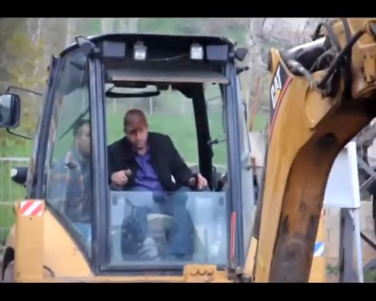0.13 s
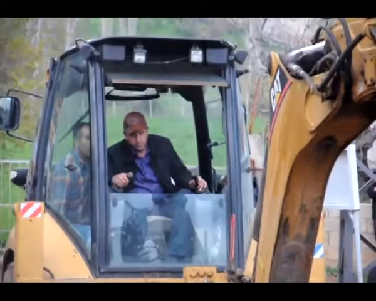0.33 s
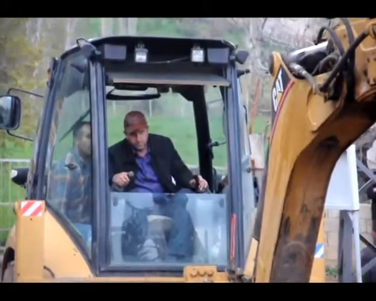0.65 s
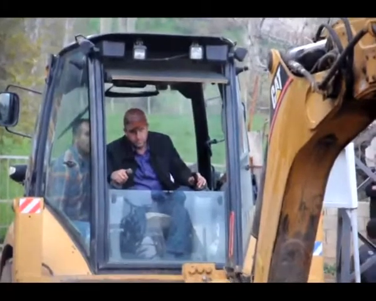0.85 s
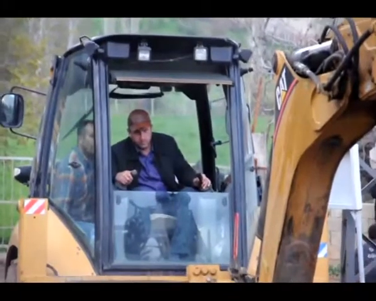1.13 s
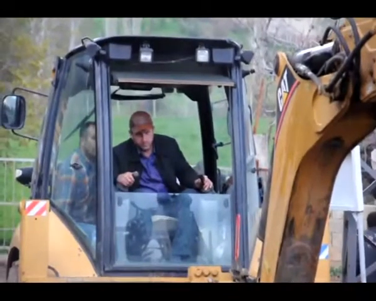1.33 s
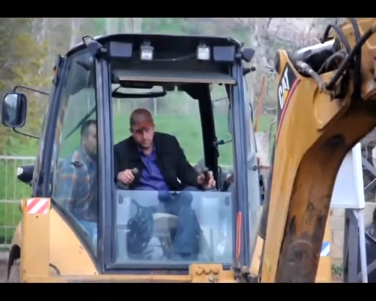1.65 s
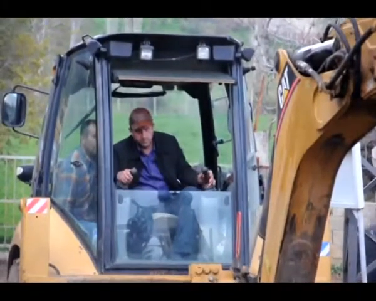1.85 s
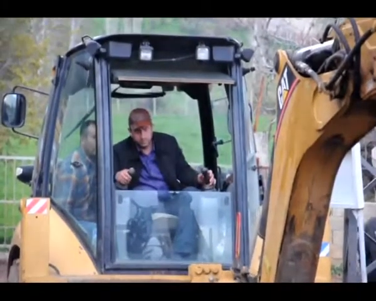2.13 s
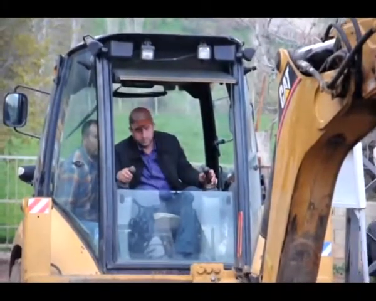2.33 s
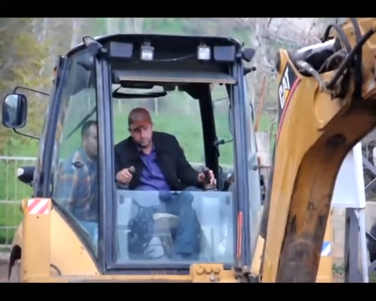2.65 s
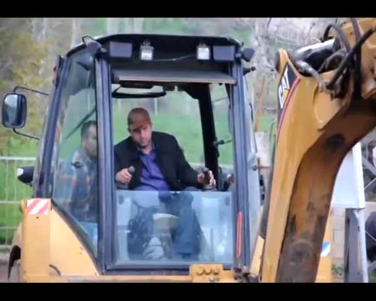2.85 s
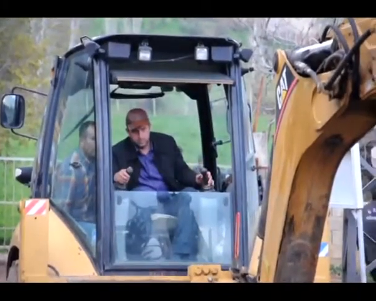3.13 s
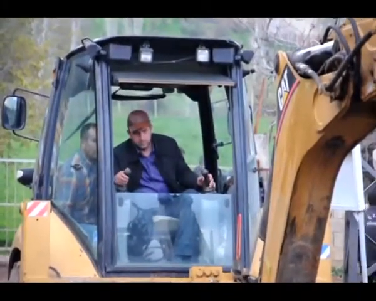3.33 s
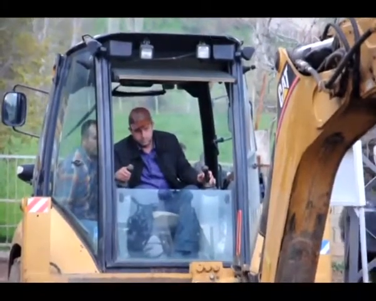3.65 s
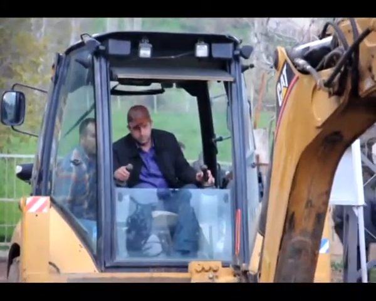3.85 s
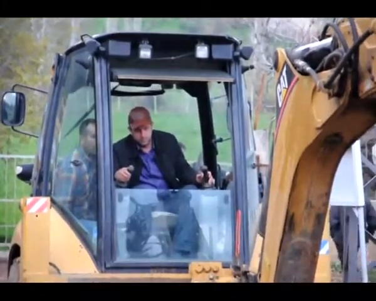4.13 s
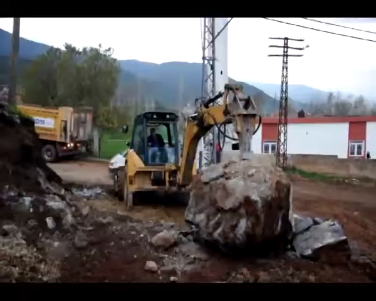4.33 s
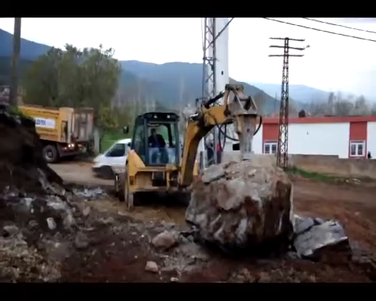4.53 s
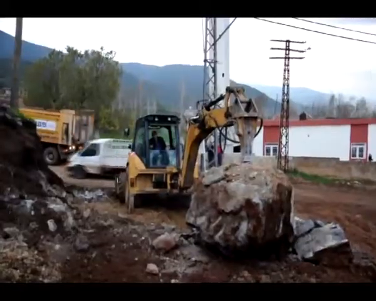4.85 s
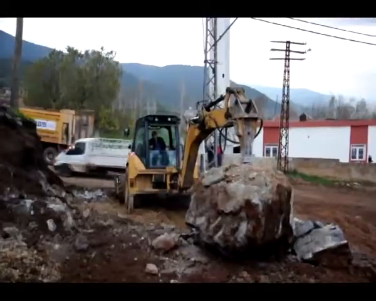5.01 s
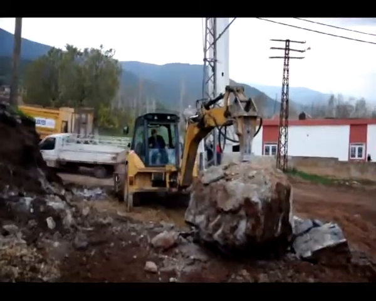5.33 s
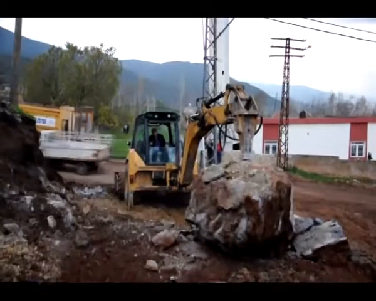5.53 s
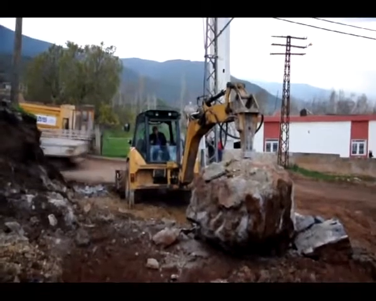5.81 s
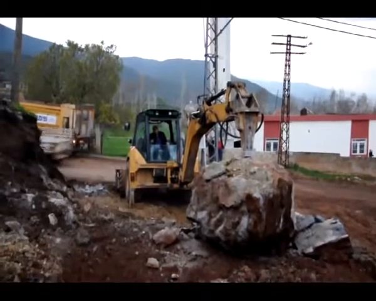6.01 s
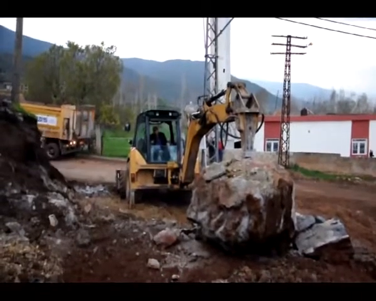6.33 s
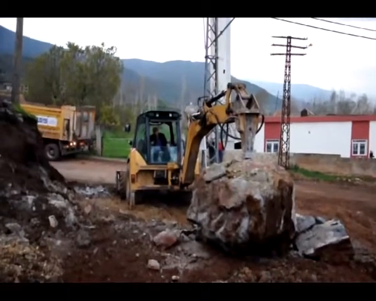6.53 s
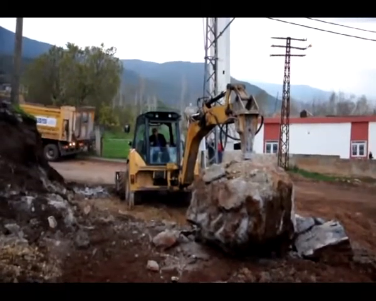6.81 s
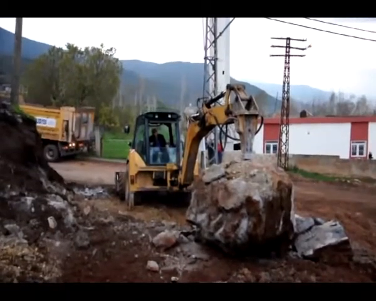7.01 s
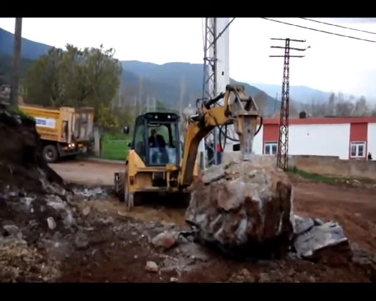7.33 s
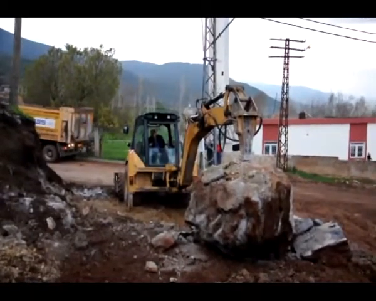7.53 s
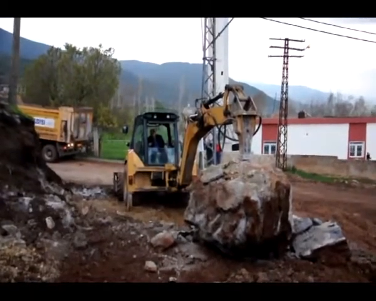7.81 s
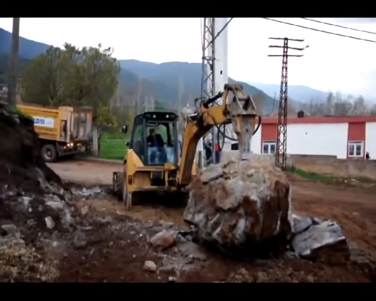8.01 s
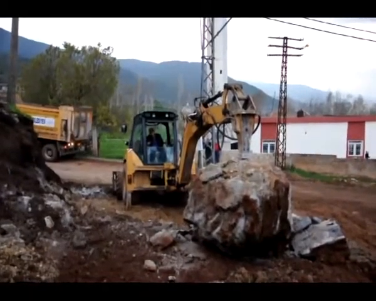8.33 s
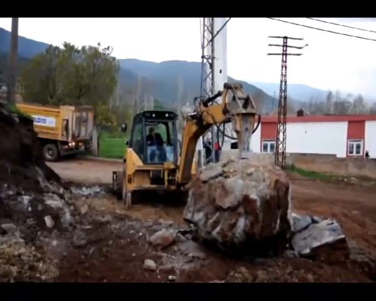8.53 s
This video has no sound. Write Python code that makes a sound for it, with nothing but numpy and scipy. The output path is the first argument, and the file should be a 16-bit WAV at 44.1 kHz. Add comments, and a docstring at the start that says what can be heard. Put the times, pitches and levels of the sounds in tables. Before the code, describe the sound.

Rapid metallic hammering on rock, each blow a short crack with ringing steel and dense clatter, starts already under way outdoors. The rhythm sags for about a second, with dull stone knocks, then returns to full speed, briefly skidding and uneven. After a quick fade and tiny gap, the same hammering rises again, more distant and regular, above engine noise and pump hum, with a faint wall echo, through a small microphone.

```python
"""A hydraulic breaker hammers a boulder at an open roadside site, some thirteen blows a second, slower from 1
to 2 s. Each blow is a short crack and a thud, ringing modes of chisel, housing and boom, and a dense clatter of
noise. A diesel engine (throbbing noise) and its pump (a wavering tone) hum below; a loose stone tumbles in
random knocks. The small microphone hears a nearby wall answer. The sound fades out, stops briefly and fades in
again; the later blows ring as if from farther off."""
import sys
import numpy as np
from scipy import signal
from scipy.fft import rfft, irfft
from scipy.io import wavfile

SR = 44100
rng = np.random.default_rng(int(sys.argv[2]) if len(sys.argv) > 2 else 0)


def transcribe(signal):
    """Save signal, clipped to [-1, 1], as a 16-bit WAV file at the path in sys.argv[1]."""
    frames = np.atleast_2d(signal).T
    limited = np.clip(frames, -1, 1)
    pcm = np.round(limited * 32767).astype(np.int16)
    wavfile.write(sys.argv[1], SR, pcm)


def gain_from_db(level_db):
    """Convert decibel levels to linear amplitude factors (20 dB per decade)."""
    decades = np.asarray(level_db, float) / 20
    return 10 ** decades


N = 382347   # samples in the scene
RING = 9000   # samples a blow lasts

# Ringing modes of chisel, housing and boom: (frequency [Hz], t60 of the main ring [s], then the relative
# level [dB] with the chisel skidding, biting, slow, steady, and heard from afar)
STEEL_MODES = [(310, 0.067, -5.5, -6, -6.5, -15.5, -15.5), (539.2, 0.097, -26, -12.5, -6.5, -8.5, -5.5),
               (617.4, 0.085, -30, -4, -5, -12.5, -11), (822, 0.039, -2.5, -3, -2, -1, 1.5),
               (920, 0.042, -8, -11, -1.5, 4, 7.5), (990, 0.03, -4.5, -8, -16, -1, 1.5),
               (1184, 0.032, 2.5, -2, -51, -11, -11.5), (1316, 0.022, 6.5, -16, -19, -18, -6),
               (1620, 0.11, -4.5, -11.5, -38, -16, -14), (1778, 0.042, -0.5, 1.5, -10, -8, -16.5),
               (1933, 0.037, -3.5, 0.5, -1, 1, -5.5), (2003, 0.058, -8, -5.5, -12, -8, -6),
               (2296, 0.07, -9.5, -9.5, -22, -18, -17), (2524, 0.054, -18, -25, -14, -11, -7.5),
               (2647, 0.03, -11, -23, -5.5, -4.5, -14), (2727, 0.048, -3.5, -6, 2.5, -6.5, -8.5),
               (3085, 0.047, -4, -7, -1, -8, -14), (3720, 0.056, -19, -14.5, -6.5, -12.5, -34),
               (3775, 0.072, -23.5, -7.5, -9.5, -4.5, -13), (4109, 0.082, -9.5, -7.5, -9.5, -14.5, -16.5),
               (4333, 0.057, -6.5, -0.5, -11.5, -12, -17), (5730, 0.017, -13, -16, -5.5, -13, -16.5),
               (6550, 0.049, -11.5, -6.5, -24, -19, -23.5), (6920, 0.18, -29.5, -26.5, -30.5, -20.5, -30)]
# Stretches of work: (start time [s], extra weight of the first instants [ratio], relative clatter level [dB],
# clatter tilt [dB per octave], relative crack level [dB], relative thud level [dB])
STRETCHES = [(-.1, 0.084, -6, 2.2, 4, -24), (.4, 0.19, -7, 2.5, 14.5, -28),
             (1.05, 0.69, -6, 2.45, 3.5, -14.5), (2.2, 0.14, -8, 1.26, 9, -21.5),
             (3.45, 0.14, -6, 1.7, 12, -30), (4.33, 0.092, -10, 1.3, 8.5, -21)]
# How the chisel sits in each stretch: (which level of STEEL_MODES [index from 0])
MODE_LEVEL_INDEX = [0, 1, 2, 3, 0, 4]
# How firmly the chisel stays put in each stretch: (likeness of successive blows [0-1])
STRETCH_LIKENESS = [.55, .75, .92, .92, .25, .93]
# Piston speed, sagging while the oil flow is shared: (time [s], rate [blows per s])
PISTON_RATE = [(0, 13.673), (.15, 12.726), (.25, 13.053), (.9, 9.658), (1.35, 8.323), (2.025, 8.797),
               (2.45, 13.225), (3.275, 13.614), (3.425, 12.764), (3.725, 14.002), (4.3, 14.392),
               (4.35, 13.539), (8.67, 13.419)]
# Runs of hammering, near and then far: (first blow [s], end [s])
HAMMERING_RUNS = [(-0.0291, 4.29), (4.3585, 8.67)]
# Force of the blows: (time [s], relative level [dB])
BLOW_FORCE = [(0, -21.5), (.45, -23.5), (1.0, -25.5), (1.15, -26.5), (2.0, -27.5), (2.3, -21.8), (2.6, -24),
              (3.4, -23), (3.85, -24.5), (4.25, -24), (4.35, -18), (5.5, -18), (5.66, -20.5), (6.3, -21.5),
              (7.6, -21), (7.85, -19), (8.2, -21), (8.67, -20)]
# Colour of the clatter: (frequency [Hz], relative level [dB])
CLATTER_COLOUR = [(60, -6), (110, -26), (230, -3), (500, -5), (900, 4.5), (1400, -8), (2500, -4.5),
                  (4500, -6.5), (7000, -11), (7800, -34), (9800, -51)]
# Dying of the clatter: (frequency [Hz], first t60 [s], late t60 [s], late part re first [dB], rise time [s])
CLATTER_DYING = [(101, 0.12, 0.11, 0, 0.00067), (680, 0.13, 0.48, -9, 0.0011),
                 (2050, 0.12, 0.23, -5, 0.00039), (7340, 0.04, 0.11, -9.5, 0.0017)]
# Colour of the engine noise: (frequency [Hz], relative density [dB per Hz])
ENGINE_COLOUR = [(15, -51), (25, -16.5), (559, 0.5), (1470, -3.5), (2670, -7.5), (3430, -10), (8180, -22),
                 (9500, -58), (12400, -68.5), (20900, -120)]
# Engine before the fades: (time [s], rms level [dB])
ENGINE_LOUDNESS = [(0, -33.5), (1.5, -44.5), (3.5, -38.5), (5, -38.5), (8.67, -45)]
# Pump hum before its waver and the fades: (time [s], rms level [dB])
PUMP_LOUDNESS = [(0, -45.5), (.9, -54), (1.2, -42), (1.7, -49), (2, -55.5), (3.4, -50.5), (3.9, -47),
                 (4.5, -46.5), (5.4, -47.5), (6.25, -40), (6.7, -52.5), (6.95, -41.5), (8.67, -44.5)]
# Loose stone knocking down the boulder: (time of the peak [s], peak of its swell [dB])
STONE_FALLS = [(.98, -26.5), (1.29, -44)]
# Faint side signal: (frequency [Hz], side re mid [dB])
SIDE_LEVEL = [(100, -33.5), (300, -50), (1400, -46), (8000, -36.5)]

CRACK_S, THUD_HZ = 0.00044, 105   # length of the steel-on-stone shock; pitch of boulder and ground
FORCE_SCATTER_DB = 1.25   # standard deviation between blows, for a wholly loose chisel
SLIP_AFTER_S = 0.0018   # earliest moment of a slip
SLIP_SPAN_S = (0.014, 0.04)   # range of each slip's moment beyond that
SLIP_SHARE = (0.74, 0.3)   # largest share of the blow in each slip, for a wholly loose chisel
ECHO_S, ECHO_DB = 0.031, -19   # delay and level of the answer from a nearby wall
FIRING_HZ, PUMP_HZ = 47.45, 257.6
STONE_LOW_HZ, STONE_HIGH_HZ = 194.8, 1100
STONE_RISE_S, STONE_FALL_DB_PER_S = 0.036, 42
FADE_START_S, SILENT_S = 4.277, 4.301
BACK_S, BACK_GAIN, FULL_S = 4.384, 0.12, 4.7
MICROPHONE_CUT_HZ = 8820


def rms_one(x):
    """Scale to rms 1."""
    return x / np.sqrt(np.mean(x ** 2) + 1e-20)


def in_time(rows):
    """Columns of a curve at every sample."""
    s, *columns = np.transpose(rows)
    return [np.interp(np.arange(N) / SR, s, c) for c in columns]


def at_hz(rows, hz):
    """Columns of a table read on a log-frequency axis."""
    f, *columns = np.transpose(rows)
    return [np.interp(np.log(hz), np.log(f), c) for c in columns]


def shaped(x, rows):
    """Filter a whole sound by a spectrum."""
    hz = np.maximum(np.arange(N // 2 + 1) * SR / N, 1)
    return irfft(rfft(x) * gain_from_db(at_hz(rows, hz)[0]), N)


def drifting(fresh, likeness):
    """Each row keeps a share of the row before it; the spread stays 1."""
    out = fresh.copy()
    for k in range(1, len(out)):
        out[k] = likeness[k] * out[k - 1] + np.sqrt(1 - likeness[k] ** 2) * fresh[k]
    return out


def blow_times():
    """The piston strikes each time its cycle count passes a whole number from the start of the run."""
    s = np.arange(-100, 8800) / 1000
    rate = np.interp(s, *np.transpose(PISTON_RATE))
    cycles = np.cumsum(rate) / 1000
    first, end = np.interp(np.transpose(HAMMERING_RUNS), s, cycles)
    return np.concatenate([np.interp(np.arange(a, b), cycles, s) for a, b in zip(first, end)])


def crack(stretch, t):
    """The first shock, one short push and pull, and the slow thud of boulder and ground behind it."""
    crack_db, thud_db = np.array(STRETCHES)[stretch, 4:].T[:, :, None]
    shock = -np.sin(2 * np.pi * np.minimum(t / CRACK_S, 1)) * np.exp(-t / CRACK_S)
    thud = np.sin(2 * np.pi * THUD_HZ * t) * (t / 0.0056) * np.exp(1 - t / 0.0045)
    return gain_from_db(crack_db) * shock + gain_from_db(thud_db) * thud


def ringing(stretch, likeness, t):
    """The steel's modes; strength and phase hold while the chisel stays put and scatter as it skids."""
    hz, t60, *levels_db = np.transpose(STEEL_MODES)
    looseness = np.sqrt(1 - likeness ** 2)[:, None, None]
    wander = looseness * rng.standard_normal((len(stretch), 2, len(hz)))
    level_db = np.array(levels_db)[np.array(MODE_LEVEL_INDEX)[stretch]]
    strength = gain_from_db(level_db + 2.76 * wander[:, 0])
    # high modes start together, low ones against each other
    signs = np.where(hz < 1100, (-1) ** np.arange(len(hz)), 1)
    struck = signs * strength * np.exp(1j * wander[:, 1])

    hz, t60 = hz[:, None], t60[:, None]
    # the shock takes longer to reach the big, low parts
    rise_s = 0.0063 * np.minimum(900 / hz, 1) ** 3
    spin = 2j * np.pi * hz * t
    onset = (1 - np.exp(-(t / rise_s) ** 2)) * np.exp(spin)
    main = gain_from_db(-60 * t / t60)
    # every mode has weaker, longer neighbours just above and below, so its tail beats
    places = np.array([-1, -0.398, 0.348, 0.96])[:, None, None]
    apart = rng.uniform(0.806, 1, (4, len(hz), 1)) * 0.035 * places
    neighbours = np.exp(spin * apart + 2j * np.pi * rng.random(apart.shape)).sum(axis=0)
    tail = gain_from_db(-13.5 - 60 * t / (3.77 * t60)) * neighbours
    # a skidding chisel chokes the long tail
    short_ring = struck @ (main * onset)
    full_ring = struck @ ((main + tail) * onset)
    return (short_ring + likeness[:, None] * full_ring).imag


def clatter(stretch, likeness, t):
    """Countless close modes of steel and stone: noise partly repeated between blows, dying band by band."""
    level_db, tilt_db = np.array(STRETCHES)[stretch, 2:4].T
    white = drifting(rng.standard_normal((len(stretch), 2, RING)), likeness)
    edges, out = 60 * 2 ** np.arange(0, 7.6, .5), 0   # half-octave bands [Hz]
    for k, (low, high) in enumerate(zip(edges, edges[1:])):
        hz = np.sqrt(low * high)
        first, late, late_db, rise = at_hz(CLATTER_DYING, hz)
        decay = gain_from_db(-60 * t / first) + gain_from_db(late_db - 60 * t / late)
        burst = white[:, k % 2] * decay * (1 - np.exp(-t / rise))
        band_pass = signal.butter(2, [low, high], "band", fs=SR, output="sos")
        band_db = at_hz(CLATTER_COLOUR, hz)[0] + 16.5 + level_db + tilt_db * np.log2(hz / 1500)
        out = out + signal.sosfilt(band_pass, burst) * gain_from_db(band_db)[:, None]
    return out


def breaker():
    """Every blow laid at its moment; a skidding chisel strikes twice more as it slips; a wall answers."""
    s = blow_times()
    stretch = np.searchsorted(np.array(STRETCHES)[:, 0], s) - 1
    likeness = np.array(STRETCH_LIKENESS)[stretch]
    carried = likeness * (np.diff(stretch, prepend=0) == 0)   # the clatter starts afresh in each stretch
    scatter_db = FORCE_SCATTER_DB * np.sqrt(1 - likeness ** 2) * rng.standard_normal(len(s))
    force_db = np.interp(s, *np.transpose(BLOW_FORCE)) + scatter_db

    t = np.arange(RING) / SR
    # a chisel pressed firmly home puts more of the energy into the first instants
    front = 1 + np.array(STRETCHES)[stretch, 1][:, None] * np.exp(-t / 0.00076)
    body = ringing(stretch, likeness, t) + clatter(stretch, carried, t)
    blows = gain_from_db(force_db)[:, None] * (front * body + crack(stretch, t))

    slips = rng.random((len(s), 2, 2))
    out = np.zeros(N + 3 * RING)   # a margin of RING lies ahead of time 0
    starts = np.round(s * SR).astype(int) + RING
    for at, blow, same, slip in zip(starts, blows, likeness, slips):
        out[at:at + RING] += blow
        for (late, share), span_s, most in zip(slip, SLIP_SPAN_S, SLIP_SHARE):
            again = at + round((SLIP_AFTER_S + span_s * late) * SR)
            out[again:again + RING] -= most * (1 - same) * share * blow   # inverted
    echo = out[RING - round(ECHO_S * SR):][:N]
    return out[RING:RING + N] + gain_from_db(ECHO_DB) * echo


def engine():
    """Diesel noise that surges at each firing and dies back before the next."""
    turn = np.arange(N) * FIRING_HZ / SR % 1   # part of the firing cycle gone by
    throb = 1 + 0.86 * np.exp(-turn / 0.043)
    noise = shaped(throb * rng.standard_normal(N), ENGINE_COLOUR)
    return gain_from_db(in_time(ENGINE_LOUDNESS)[0]) * rms_one(noise)


def pump():
    """One nearly steady tone whose level and pitch waver a little."""
    slow = signal.butter(2, 9.0, fs=SR, output="sos")
    level_waver, pitch_waver = rms_one(signal.sosfilt(slow, rng.standard_normal((2, N))))
    level_db = in_time(PUMP_LOUDNESS)[0] + 1.7 * level_waver
    phase = 2 * np.pi * np.cumsum(PUMP_HZ + 1.7 * pitch_waver) / SR
    return np.sqrt(2) * gain_from_db(level_db) * np.sin(phase)


def tumbling_stone():
    """Dense dull knocks at random, each ringing a few cycles at one of twelve pitches."""
    happens = rng.random(N) < 2500 / SR   # about 2500 knocks a second
    sizes = gain_from_db(2.5 * np.minimum(rng.exponential(1, N), 3)) * rng.choice([-1, 1], N) * happens
    dealt, out = rng.integers(0, 12, N), 0
    for k, hz in enumerate(np.geomspace(STONE_LOW_HZ, STONE_HIGH_HZ, 12)):
        radius = gain_from_db(-60 * hz / (12.0 * SR))   # falls 60 dB in twelve cycles
        w = 2 * np.pi * hz / SR
        resonator = [1, -2 * radius * np.cos(w), radius * radius]
        knocks = signal.lfilter([1, 0, -1], resonator, sizes * (dealt == k) + 1e-18)
        out = out + gain_from_db(3.5 * np.log2(hz / 400)) * knocks
    dull = rms_one(signal.sosfilt(signal.butter(4, 1300, fs=SR, output="sos"), out))

    falls = np.array(STONE_FALLS)
    since = np.arange(N) / SR - falls[:, :1]
    fall = gain_from_db(falls[:, 1:] - STONE_FALL_DB_PER_S * np.maximum(since, 0))
    swell = fall * np.clip(1 + since / STONE_RISE_S, 0, 1) ** 2
    return swell.sum(axis=0) * dull


def fade():
    """A quick fade to silence, then a step and a slower rise."""
    t = np.arange(N) / SR
    fade_out = np.interp(t, [FADE_START_S, SILENT_S], [1, 0]) ** 2
    fade_in = (t > BACK_S) * np.interp(t, [BACK_S, FULL_S], [BACK_GAIN, 1])
    return fade_out + fade_in


def scene():
    """All sources come from the same direction; left and right differ only by a faint side signal."""
    mid = breaker() + engine() + pump() + tumbling_stone()
    side = shaped(np.roll(mid, 40), SIDE_LEVEL)   # 40 samples late
    return np.array([mid + side, mid - side]) * fade()


def roll_off(x):
    """The treble ends steeply here."""
    return signal.sosfilt(signal.butter(12, 9840, fs=SR, output="sos"), x)


def record(dry):
    """A small microphone: the top is cut steeply."""
    low_pass = signal.butter(10, MICROPHONE_CUT_HZ, fs=SR, output="sos")
    mix = signal.sosfilt(low_pass, dry)
    return roll_off(mix)


dry = scene()
out = record(dry)
transcribe(out)
```